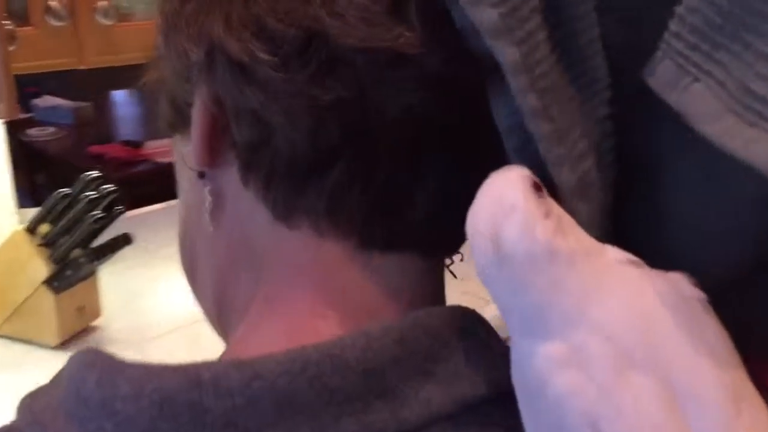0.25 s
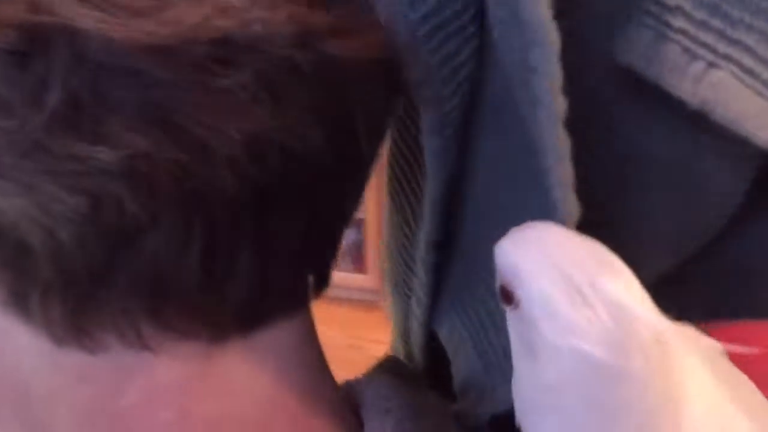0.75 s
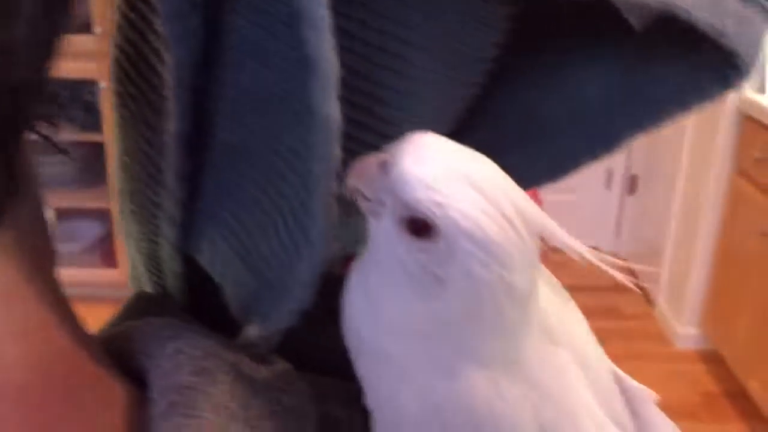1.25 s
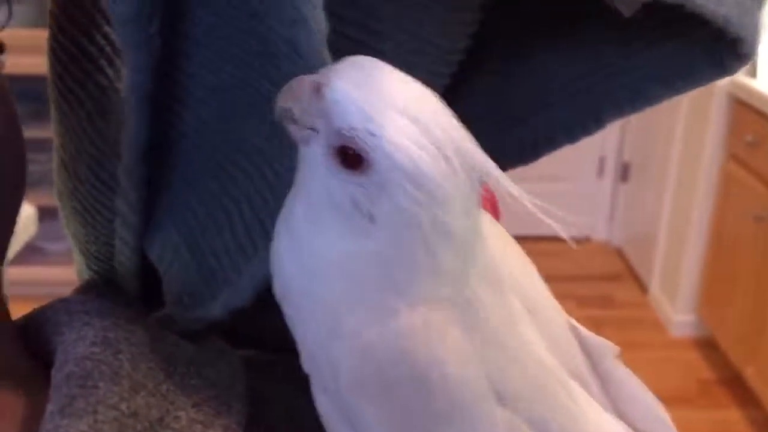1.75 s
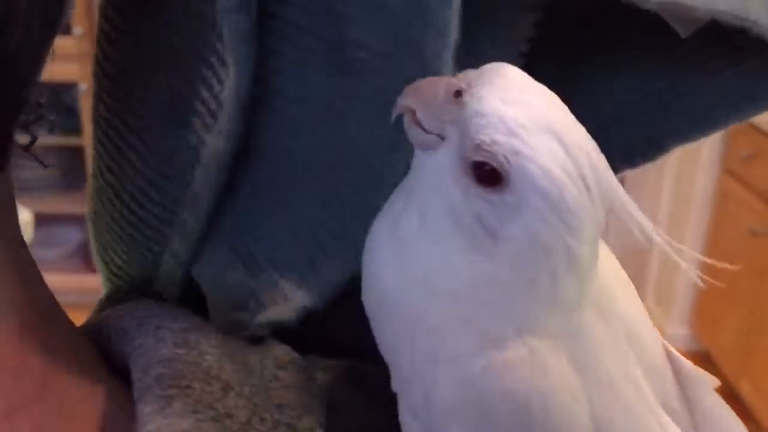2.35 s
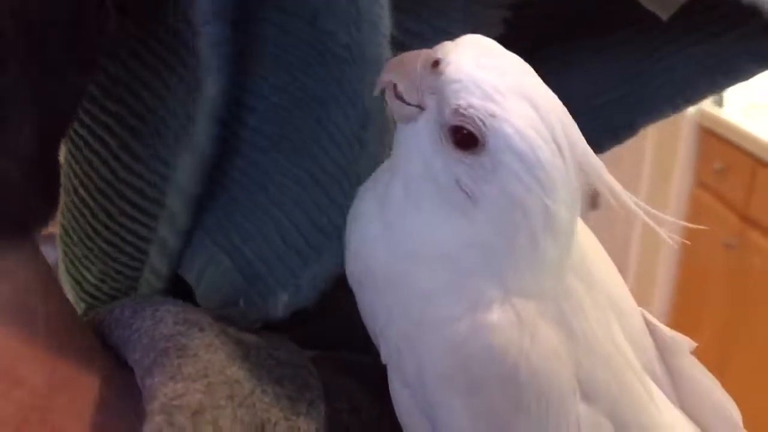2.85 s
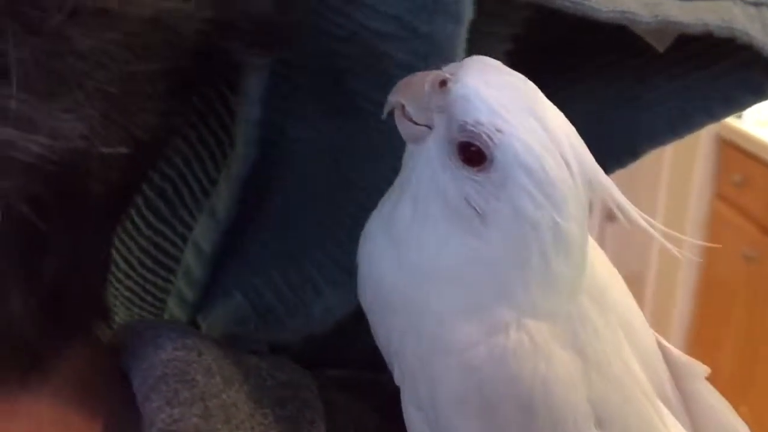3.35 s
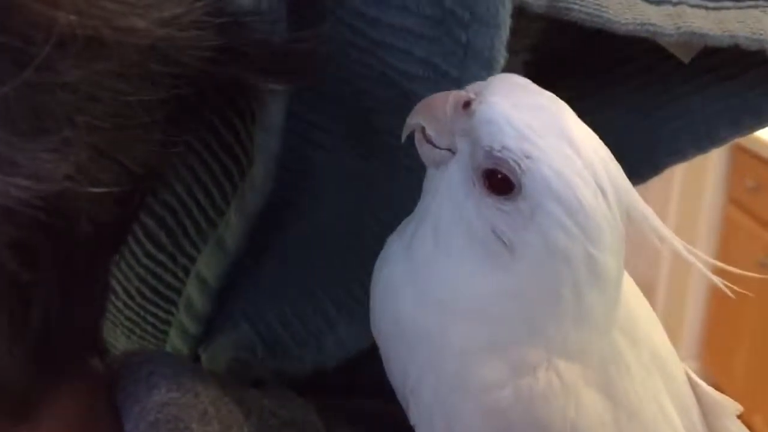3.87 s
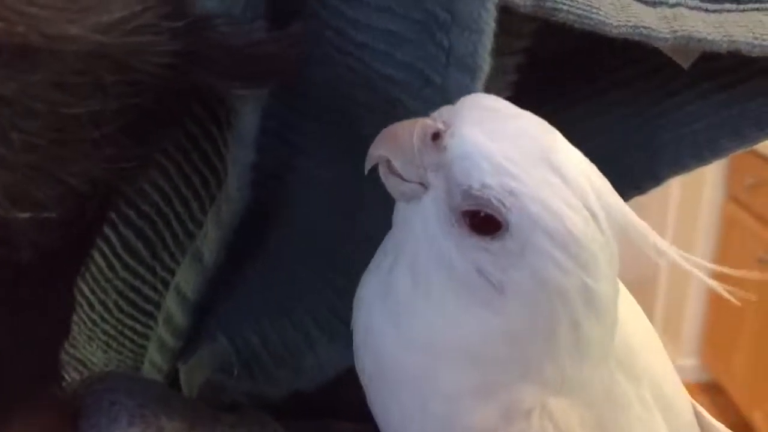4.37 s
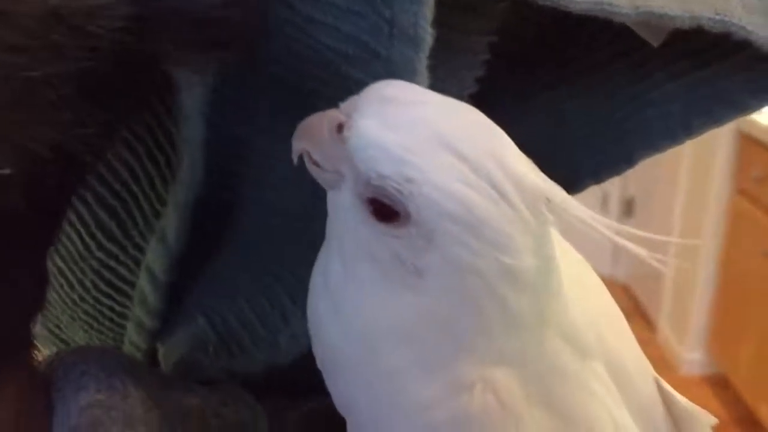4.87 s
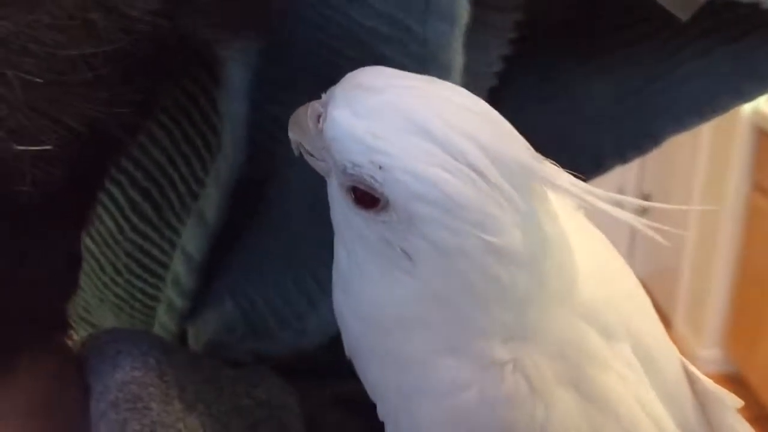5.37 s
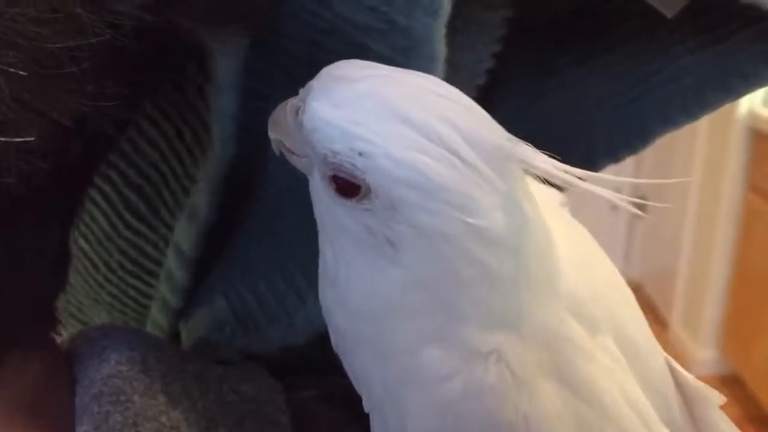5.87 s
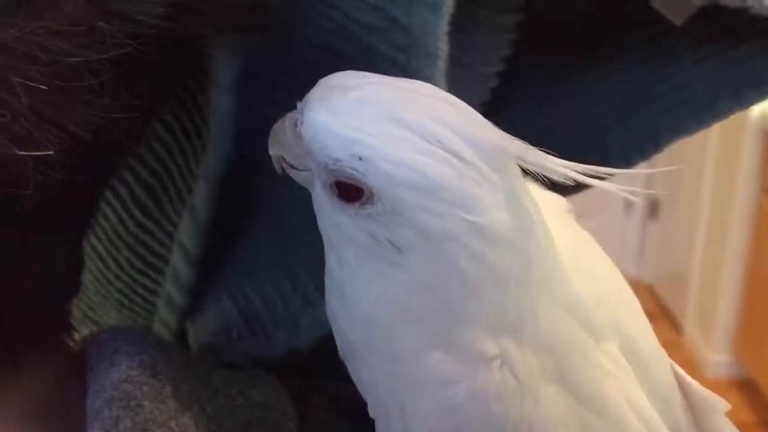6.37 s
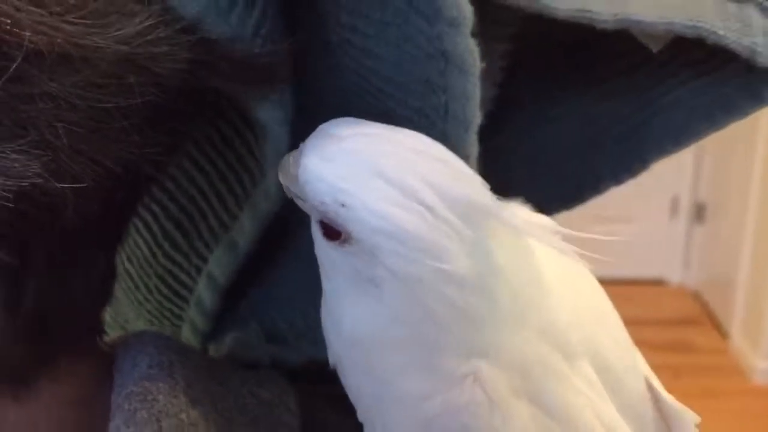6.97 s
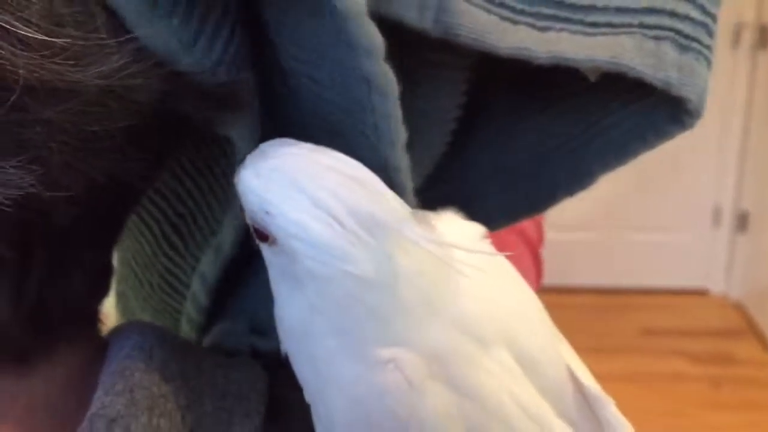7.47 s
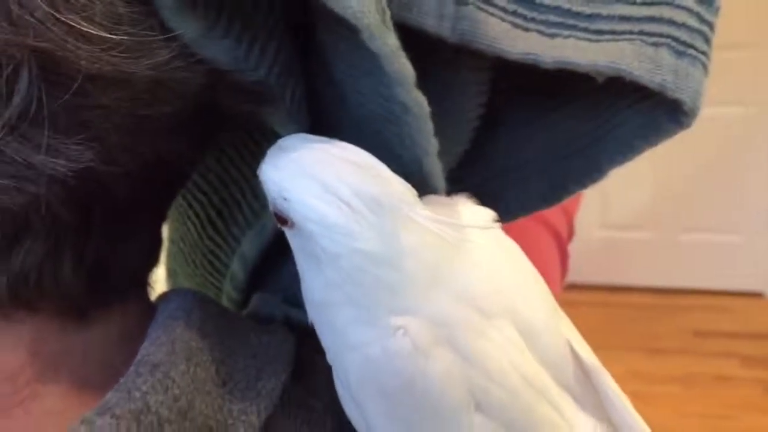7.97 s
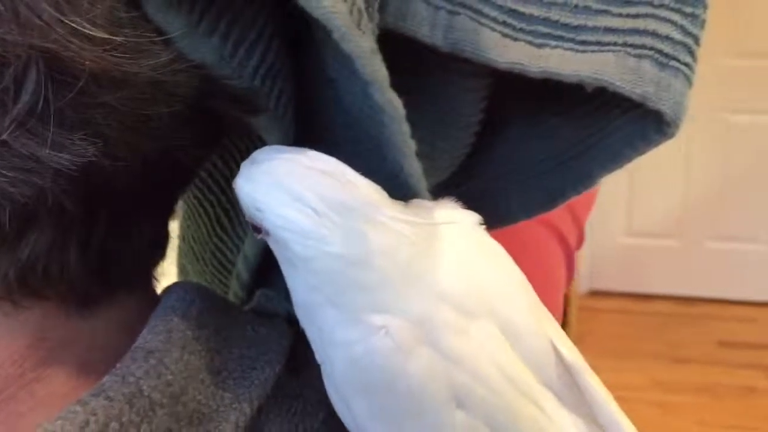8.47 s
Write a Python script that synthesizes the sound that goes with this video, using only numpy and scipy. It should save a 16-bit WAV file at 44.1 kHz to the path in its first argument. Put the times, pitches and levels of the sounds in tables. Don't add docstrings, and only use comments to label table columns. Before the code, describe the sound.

A white cockatiel close by repeats short, raspy, trilled chirps two or three times a second, gradually slowing, over a faint kitchen fridge hum.

```python
import sys
import numpy as np
from scipy import signal
from scipy.fft import rfft, irfft, next_fast_len
from scipy.io import wavfile
from scipy.ndimage import uniform_filter1d, map_coordinates

SR = 44100
rng = np.random.default_rng(int(sys.argv[2]) if len(sys.argv) > 2 else 0)


def materialize(psi):
    bounded = np.clip(np.atleast_2d(psi).T, -1, 1)
    quanta = np.round(bounded * 32767).astype(np.int16)
    wavfile.write(sys.argv[1], SR, quanta)


def invert_db(x):
    u = np.asarray(x, float) / 20
    return 10 ** u


N = 384552
LEAD = SR // 5
M = N + LEAD
TIME = (np.arange(M) - LEAD) / SR

# start in seconds, length in seconds, peak level in dB,
# overtone boost as the beak turns in dB, unsteadiness from 0 to 1.
CHIRPS = [(-.14, .158, -15, -14, 0), (1.264, 0.16, -22, 3, 0.64), (1.565, 0.15, -21, -1, .7),
          (1.864, .15, -20.5, 2, 0.62), (2.152, 0.15, -18.5, 0, 0.47), (2.461, 0.14, -17.5, 0.5, .5),
          (2.767, 0.13, -18.5, 2.5, .43), (3.074, 0.15, -18, 7, .35), (3.395, 0.15, -18.5, -0.5, 0.35),
          (3.715, 0.15, -18.5, -1, 0.35), (4.054, 0.15, -17, -2, 0.24), (4.44, 0.15, -16.5, 0, 0.32),
          (4.88, 0.15, -17, 1, 0.21), (5.342, 0.14, -17.5, 0, .16), (5.818, 0.15, -17, -1, 0.08),
          (6.301, 0.14, -16, -1.5, 0.29), (6.773, 0.15, -15.5, -3, 0.1), (7.282, 0.13, -16.5, -4, 0.05),
          (7.793, .15, -20.5, 0.5, .6), (8.374, 0.17, -20, -.5, .14)]


def bird():
    sound, out = port(voice()), np.zeros(M + SR)
    for first, length, *_ in CHIRPS:
        last = first + length
        a, b = LEAD + round(first * SR), LEAD + round(last * SR)
        attack, release = (TIME[a:b] - first) / 0.004, (last - TIME[a:b]) / 0.017
        chirp = sound[a:b] * np.clip(np.minimum(attack, release), 0, 1)
        out[a:b] += chirp
        echo = invert_db(-19) * room(chirp)
        out[a:a + len(echo)] += echo[:len(out) - a]
    return out[:M]


# whistle clears, falters and recovers, in seconds after the start,
# then the rasp share when broken from 0 to 1.
STAGES = [(.03, 0.17, 0.11, 0.9), (.04, .11, 0.16, 0.7), (.024, 0.067, 0.13, 1), (.031, 0.074, .12, 0.8),
          (0.018, 0.11, 0.051, 0.3), (0.015, .07, 0.069, 0.3), (.024, 0.081, 0.096, 0.7),
          (0.029, 0.065, 0.15, 0.4), (0.025, .055, .14, 0.58), (.029, .058, 0.11, 0.7),
          (0.029, .075, .135, 0.69), (.031, 0.079, .135, 0.67), (.027, .088, .142, .97),
          (0.028, .095, 0.15, .85), (.026, .105, 0.12, .8), (.025, 0.095, .125, 0.66),
          (.031, .115, 0.13, 0.67), (.033, 0.091, .11, 0.59), (0.029, 0.037, 0.12, 0.52),
          (.042, .092, .135, 0.7)]
# opening in dB, clear whistle in dB, after the falter in dB.
REGISTER = [(-23.5, -19.5, -22), (-4, -19, -19), (-7.5, -17.5, -15), (-3, -13.5, -5), (-1.5, -14, -0.5),
            (-2.5, -9, -6), (6, -13, 0), (-1.5, -12.5, -8), (-3.5, -18.5, -6), (-9, -15.5, -8.5),
            (-6.5, -22.5, -8), (-2, -21.5, -8), (-8, -14, -11), (-11, -24.5, -29), (-11.5, -26.5, -17),
            (-16, -27.5, -18), (-22.5, -36, -18.5), (-8, -26, -28.5), (-4, -2.5, -3), (-5.5, -21.5, -3)]
FADE_DB = [13.5, 12.5, 15, 13, 10.5, 13.5, 8.5, 16, 14.5, 18.5, 16.5, 16.5, 13, 15, 15.5, 18, 17, 20, 18,
           14]
# time in seconds, pitch in Hz, mobility (how far it trills and sags).
HIGH_PITCH = [(1.3, 2790, .4), (1.9, 2977, 1.1), (3.2, 3030, 1.2), (4.5, 2994, 1.1), (5., 2773, .5),
              (7.801, 2751, .3), (8.6, 2720, .25)]


def voice():
    first_break, widening = 0.48, 3.5
    late_rasp, rasp_brightens, break_dip_db = 0.81, 1, 2
    high_sag = 0.14
    which, since = stages()
    length, peak_db = np.array(CHIRPS)[which, 1:3].T
    clears, falters, recovers, share = np.array(STAGES)[which].T
    opening_db, clear_db, late_db = np.array(REGISTER)[which].T
    hz, turn, depth, bright_db, hoarse = syrinx(which)

    climb = np.cos(turn + 2.0)
    upswing = (.5 + .5 * climb) ** 2.5
    opening, late = since < clears, since > falters
    edge = np.maximum(first_break - widening * (since - falters) / (recovers - falters), -.7)
    edge = edge + .4 * wobble(70)
    breaking = late & (since < recovers) & (climb > edge)
    broken = uniform_filter1d(1. * (opening | breaking), size=60)

    flips = np.where(since > recovers, 1.3, .11 + .3 * late + 1.6 * upswing)
    high = np.where(opening, invert_db(opening_db), invert_db(np.where(late, late_db, clear_db)) * flips)
    high = np.clip(uniform_filter1d(high * invert_db(4 * np.tanh(wobble(90))), size=60), 0, .97)
    flipped = np.clip((high - .6) / .3, 0, 1)
    rough = share * np.where(late, late_rasp, 1) * broken * (1 - 0.63 * flipped)
    rough = np.clip(rough + .24 * high + 0.091 * hoarse, 0, .99)

    s, start_hz, mobility = np.transpose(HIGH_PITCH)
    mobile = np.interp(TIME, s, mobility)
    sag = high_sag * np.clip(since / length, 0, 1) ** 3
    high_hz = np.interp(TIME, s, start_hz) * (1 + mobile * (.03 * wobble(60) - sag))
    high_hz = high_hz + mobile * depth * np.cos(turn + 0.68)
    upper = squeal(high_hz, bright_db - 6 * mobile, flipped)
    voiced = np.sqrt(1 - high ** 2) * whistle(hz, turn, depth, bright_db) + high * upper

    harsh = rasp(rate_hz=2500, jitter=.3, scatter=0.97)
    treble = signal.sosfilt(signal.butter(2, 3000, "high", fs=SR, output="sos"), harsh)
    harsh = harsh + (invert_db(rasp_brightens * bright_db) - 1) * treble
    breath_db = effort(since, length, peak_db, clears, np.array(FADE_DB)[which])
    breath_db = breath_db + 3.22 * flipped - break_dip_db * late * broken
    return (np.sqrt(1 - rough ** 2) * voiced + rough * harsh) * invert_db(breath_db)


def stages():
    start = np.transpose(CHIRPS)[0]
    which = np.clip(np.searchsorted(start - .02, TIME) - 1, 0, None)
    return which, TIME - start[which]


def effort(since, length, peak_db, clears, fade_db):
    onset_db, swell_s, fade_bend = 20.5, .01, 2.07
    top = clears + swell_s
    rising = np.clip(1 - since / top, 0, .85)
    fading = np.clip((since - top) / (length - top), 0, 1)
    return peak_db - onset_db * rising ** 1.51 - fade_db * fading ** fade_bend


# time of a trill crest in seconds, pitch in Hz, drift in Hz per second,
# trill depth in Hz, trill rate in Hz.
TRILL = [(-.06, 2040, -400, 162, 84), (1.3218, 2006, -364, 191.5, 85.3), (1.6321, 2037, -1133, 201.3, 83.8),
         (1.9417, 2077, -1500, 184, 80.2), (2.2207, 2140, 277, 186, 78.8),
         (2.5214, 2178, -1105, 185.4, 79.7), (2.8405, 2162, 795.5, 179.7, 79),
         (3.1386, 2188, -492, 218.4, 82.5), (3.4636, 2116, -861, 219.8, 84.1),
         (3.7813, 2122, -602, 201.8, 78), (4.1212, 2113, 555.5, 210, 82.6),
         (4.5097, 2151, -1500, 205.1, 84.8), (4.945, 2155, -819, 183.2, 87.6),
         (5.3979, 2162, -1341, 138, 86.7), (5.8932, 2142, -282, 138, 86.4),
         (6.3741, 2178, -1500, 115.4, 85.5), (6.8381, 2171, -962, 135.9, 88),
         (7.3528, 2091, -506, 140, 77.8), (7.8495, 2142, -2.5, 151, 82.1),
         (8.4496, 2162, 803.5, 183.8, 87.8)]


def syrinx(which):
    slowing_hz_per_s, narrowing_per_s = -70, 4
    arch_hz_per_s2 = 9000
    crest, hz, drift, depth, rate = np.array(TRILL)[which].T
    bright_db, hoarse = np.array(CHIRPS)[which, 3], np.clip(np.array(CHIRPS)[which, 4], 0, 1)
    t = np.clip(TIME - crest, -.15, .15)
    turn = 2 * np.pi * (rate * t + slowing_hz_per_s * t * t)
    shape = np.cos(turn) + 0.084 * np.sin(2 * turn)
    jitter = 14 * wobble(300) + 200 * hoarse * np.tanh(wobble(1600))
    trill = depth * (1 - narrowing_per_s * t) * shape
    pitch = hz + drift * t - arch_hz_per_s2 * t * t + trill + jitter
    return pitch, turn, depth, bright_db, hoarse


def whistle(hz, turn, depth, bright_db):
    steady = np.clip((240 - depth) / 140, .25, 1.5)
    throb = np.hypot(.45 + np.cos(turn - .1), steady) / np.sqrt(.7 + steady ** 2)
    return unit(partials(hz, bright_db, throb * invert_db(1.4 * wobble(140)), count=7))


def squeal(hz, bright_db, flipped):
    unsteady = 1 - .55 * flipped
    wavering = hz * (1 + unsteady * (.03 * wobble(250) + .04 * wobble(1800)))
    swell = invert_db(5 * unsteady * np.tanh(wobble(350)))
    return unit(partials(wavering, bright_db + 9, swell, count=2))


# frequency in Hz, gain in dB.
WHISTLE = [(1800, 2), (2000, 1), (2350, -2), (3000, 3), (4000, -18), (4600, -15.5), (5050, -21),
           (5500, -20.5), (6000, -27), (7150, -23.5), (7700, -43), (8500, -37.5), (9600, -40.5),
           (10300, -60), (11300, -48.5), (13000, -25.5), (14800, -45), (16000, -35.5)]


def partials(hz, bright_db, throb, count):
    phase = 2 * np.pi * np.cumsum(hz) / SR
    overtones = 0
    for k in range(2, count + 1):
        overtones = overtones + invert_db(along(WHISTLE, k * hz) + 2 * bright_db / k) * np.sin(k * phase)
    return throb * invert_db(along(WHISTLE, hz)) * np.sin(phase) + throb ** 0.66 * overtones


# frequency in Hz, level in dB per Hz.
RASP = [(240, -73), (400, -47), (1060, -5.5), (1600, -5), (1930, -2), (2750, -9.5), (3690, -18.5),
        (5430, -16), (6050, -40.5), (8500, -38.5), (10500, -53), (12900, -26.5), (14800, -37),
        (16000, -35.5)]


def rasp(rate_hz, jitter, scatter):
    draws = np.tanh(rng.standard_normal((int(M / SR * 4000), 2)))
    at = np.cumsum(np.clip(1 + jitter * draws[:, 0], .4, 3)) * SR / rate_hz
    size = 1 + scatter * draws[:, 1]
    size, at = size[at < M - 2], at[at < M - 2]
    part = at % 1
    slaps = np.bincount(at.astype(int), size * (1 - part), M)
    slaps = slaps + np.bincount(at.astype(int) + 1, size * part, M)
    return coloured((slaps - slaps.mean()) * invert_db(2.5 * np.tanh(wobble(260))), RASP)


def port(x):
    return signal.sosfilt(signal.butter(2, [9800, 11200], "bandstop", fs=SR, output="sos"), x)


# frequency in Hz, time to decay by 60 dB in seconds.
KITCHEN = [(1200, 0.32), (2100, 0.6), (3300, 0.31), (4500, 0.28), (6000, 0.21), (12000, 0.062)]


def room(x):
    hz, t, z = signal.stft(rng.standard_normal(SR * 3 // 4), SR, nperseg=256)
    decay = invert_db(-60 * t / along(KITCHEN, hz)[:, None])
    tail = signal.istft(z * decay, SR, nperseg=256)[1]
    return signal.fftconvolve(np.pad(x, (250, 0)), tail / np.linalg.norm(tail))


# time in seconds, peak level in dB, body frequency in Hz,
# time to decay by 60 dB in seconds, click level in dB.
KNOCKS = [
    (.289, -47.5, 357, 0.12, 7.5),
    (.482, -44, 690, 0.066, -28),
    (0.504, -49, 111, 0.098, -28),
    (.671, -58.5, 400, 0.067, -1),
    (1.267, -41, 133, 0.077, -28),
]


def knocks():
    out, t = np.zeros(M + SR), np.arange(SR // 3) / SR
    for s, db, hz, t60, click_db in KNOCKS:
        noise = rng.standard_normal((2, len(t)))
        resonance = [(hz / 4, -25), (hz / 1.4, -4), (hz * 1.2, 0), (hz * 2.2, -16), (16000, -60)]
        body = coloured(noise[0], resonance)
        click = coloured(noise[1], [(300, -30.5), (900, 7.5), (2500, -1.5), (6000, -35), (16000, -25)])
        ringing = invert_db(-60 * t / t60) + .12 * invert_db(-60 * t / .5)
        bump = body * ringing + invert_db(click_db - 60 * t / .16) * click
        out[LEAD + round(s * SR):][:len(t)] += invert_db(db - 4) * bump
    return out[:M]


# time in seconds, level in dB.
CLOTH = [
    (0.26, -81),
    (0.276, -84.5),
    (0.29, -60),
    (0.386, -57),
    (0.546, -79.5),
    (1.231, -76),
    (1.5, -75),
    (1.9, -84),
]
# frequency in Hz, level in dB per Hz.
WEAVE = [(1470, -4.5), (2500, -7), (4050, -12), (6300, -2.5), (13200, -12), (16000, -22)]
# frequency in Hz, level in dB per Hz.
RUSTLE = [(290, -30), (500, -9.5), (2190, -17.5), (4340, -19.5), (16000, -36)]


def cloth():
    s, db = np.transpose(CLOTH)
    level = np.interp(TIME, s, db, -120, -120)
    fast = np.clip((level + 72) / 10, 0, 1)
    grains = rng.standard_normal((2, M)) * invert_db(0.84 * wobble(360))
    swish = fast * coloured(grains[0], WEAVE)
    rustle = 1.5 * (1 - fast) * coloured(grains[1], RUSTLE)
    return invert_db(level) * (swish + rustle)


# frequency in Hz, level in dB per Hz.
JOLTS = [(20, -24.5), (50, 0.5), (90, 5), (300, -36), (16000, -100)]


def hand():
    return invert_db(-78.5) * unit(invert_db(10 * np.tanh(wobble(5.1))) * coloured(rng.standard_normal(M), JOLTS))


# frequency in Hz, peak level in dB.
FRIDGE = [
    (193.8, -75),
    (242.2, -71),
]
# frequency in Hz, level in dB per Hz.
HUM = [(22, -37.5), (55, -13.5), (108, -11.5), (217, -3.5), (326, -14), (1000, -23.5), (3520, -27),
       (16000, -40.5)]


def fridge():
    lines = 0
    for hz, db in FRIDGE:
        strength = invert_db(db + 0.83 * wobble(6.2))
        lines = lines + strength * np.sin(2 * np.pi * hz * TIME + .6 * wobble(22))
    hum_db = -68 + .9 * wobble(1.7)
    return lines + invert_db(hum_db) * coloured(rng.standard_normal(M), HUM)


def unit(x):
    return x / np.sqrt(np.mean(x ** 2) + 1e-20)


def along(points, hz):
    f, v = np.transpose(points)
    return np.interp(np.log(hz + 1), np.log(f + 1), v)


def wobble(rate):
    return map_coordinates(rng.standard_normal(int(M * rate / SR) + 4), [np.arange(M) * rate / SR])


def coloured(x, spectrum):
    m = next_fast_len(len(x) + 8192, True) // 2 * 2
    ceps = irfft(np.log(invert_db(along(spectrum, np.fft.rfftfreq(m, 1 / SR))) + 1e-6), m)
    ceps[1:m // 2] *= 2
    ceps[m // 2 + 1:] = 0
    return unit(irfft(rfft(x, m) * np.exp(rfft(ceps)), m)[:len(x)])


def scene():
    return (bird() + knocks() + cloth() + hand() + fridge())[None, LEAD:]


def top_cut(x):
    return signal.sosfilt(signal.butter(12, 15960, fs=SR, output="sos"), x)


def record(dry):
    m = next_fast_len(N + 8192, True)
    keep = np.clip((16000 - np.fft.rfftfreq(m, 1 / SR)) / 250, 0, 1)
    kept = irfft(rfft(dry, m) * keep, m)[:, :N]
    return top_cut(kept)


dry = scene()
out = record(dry)
materialize(out)
```